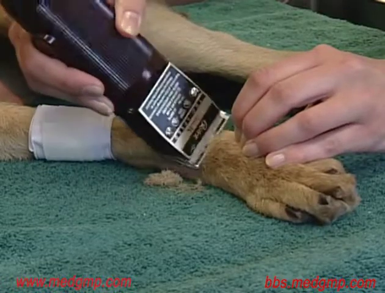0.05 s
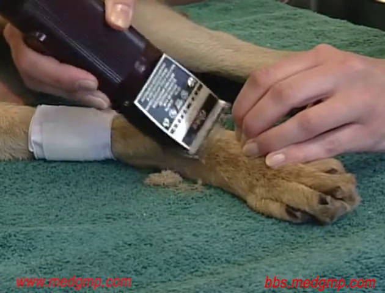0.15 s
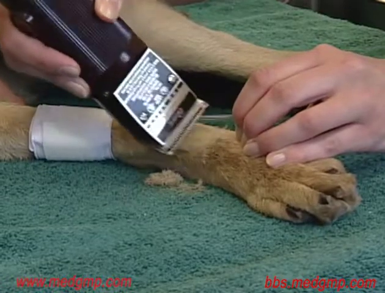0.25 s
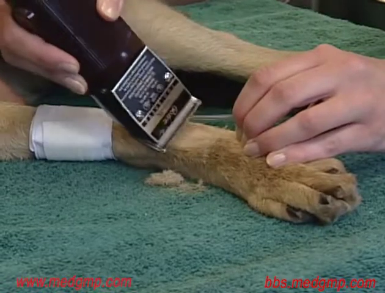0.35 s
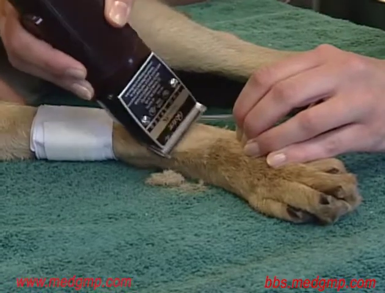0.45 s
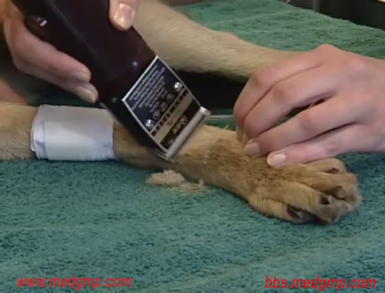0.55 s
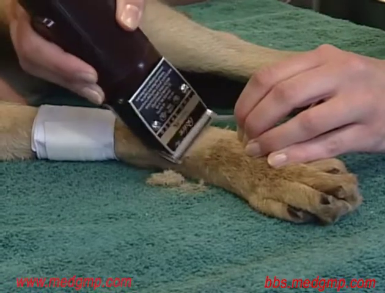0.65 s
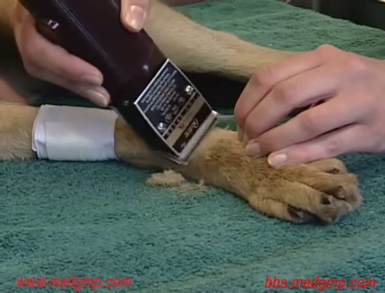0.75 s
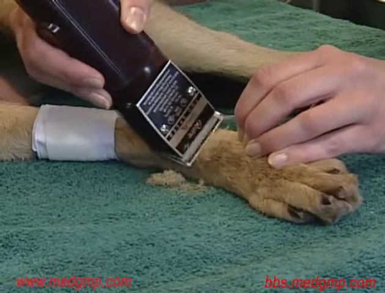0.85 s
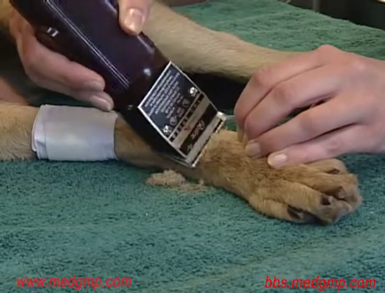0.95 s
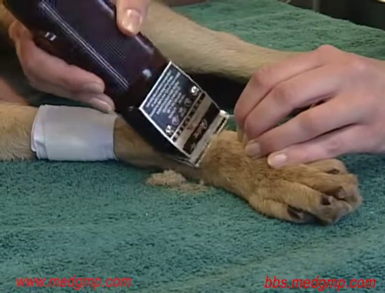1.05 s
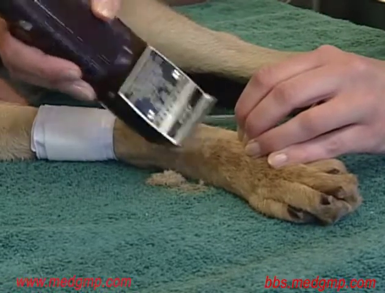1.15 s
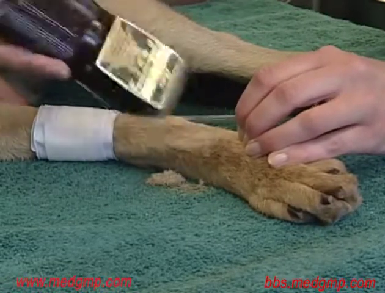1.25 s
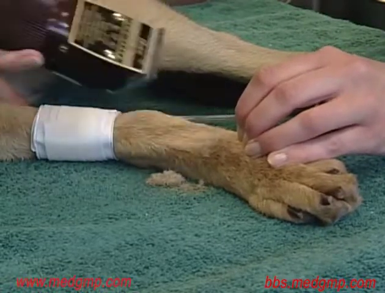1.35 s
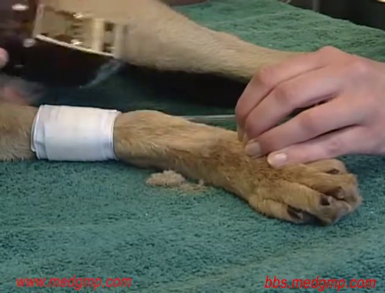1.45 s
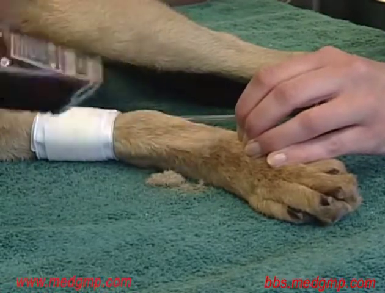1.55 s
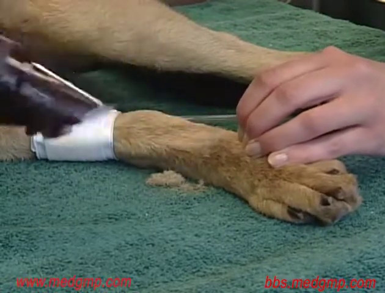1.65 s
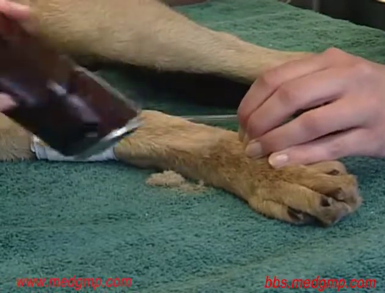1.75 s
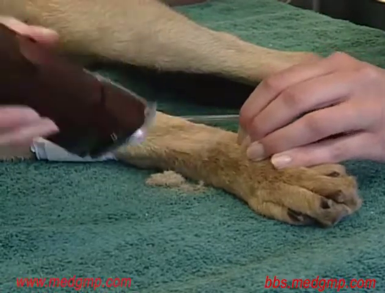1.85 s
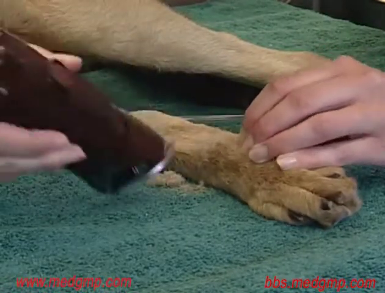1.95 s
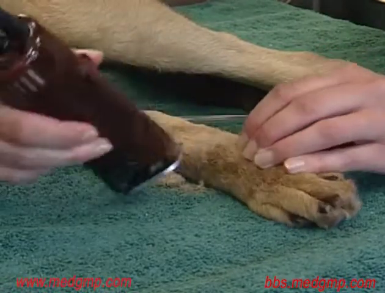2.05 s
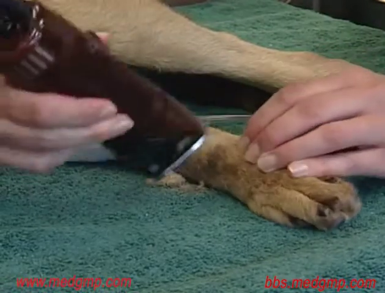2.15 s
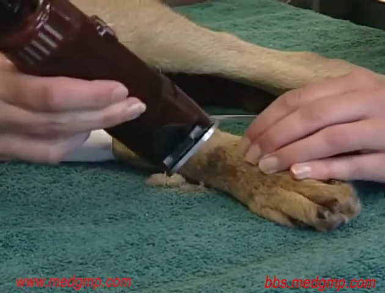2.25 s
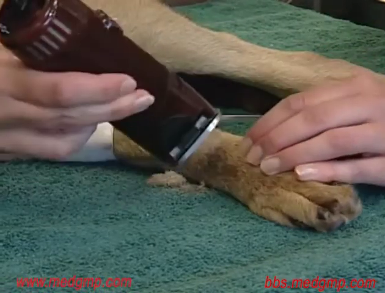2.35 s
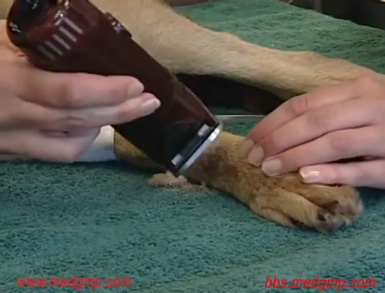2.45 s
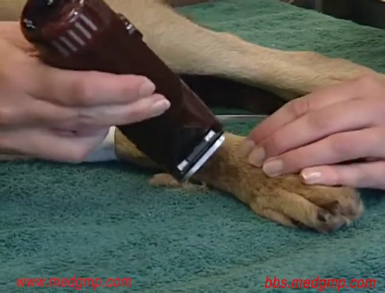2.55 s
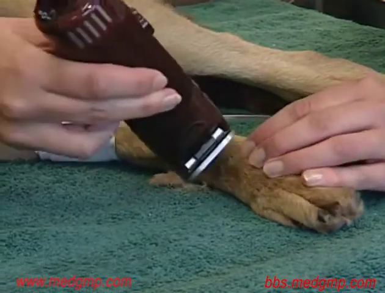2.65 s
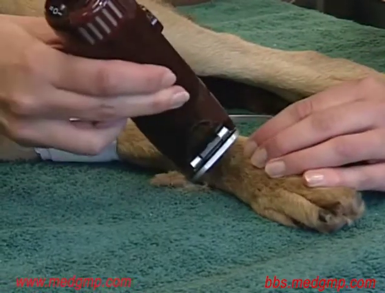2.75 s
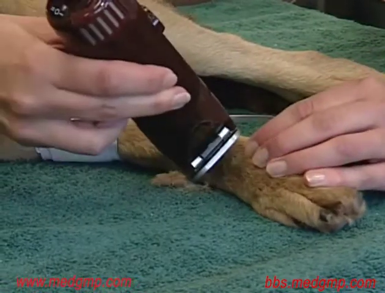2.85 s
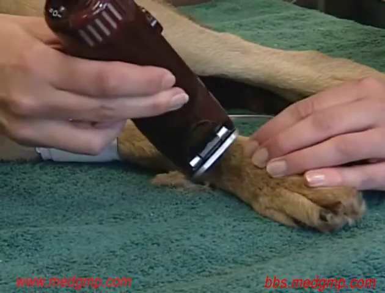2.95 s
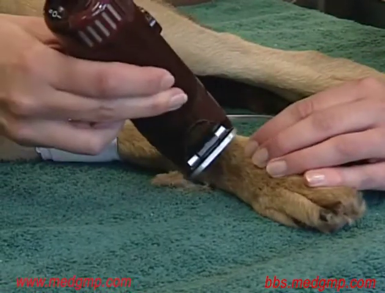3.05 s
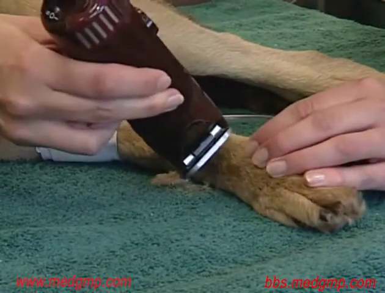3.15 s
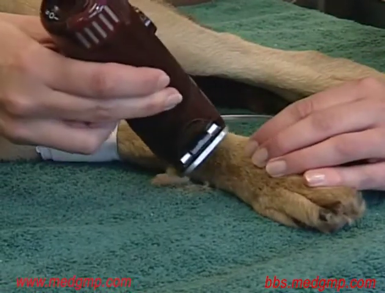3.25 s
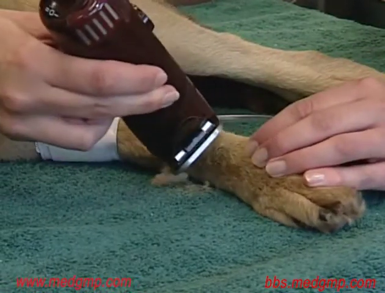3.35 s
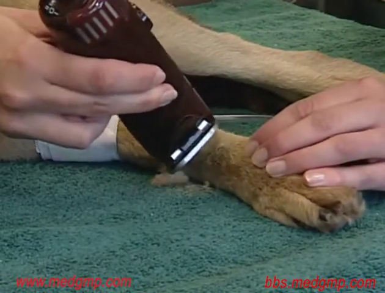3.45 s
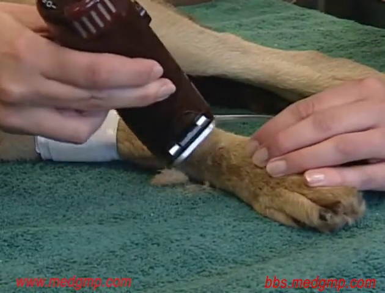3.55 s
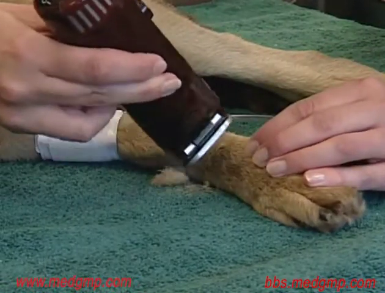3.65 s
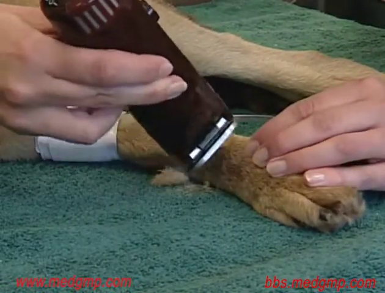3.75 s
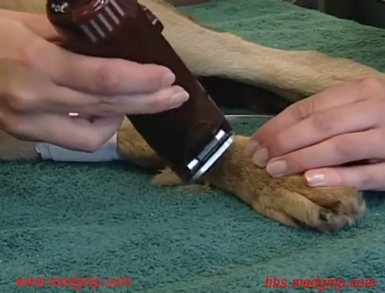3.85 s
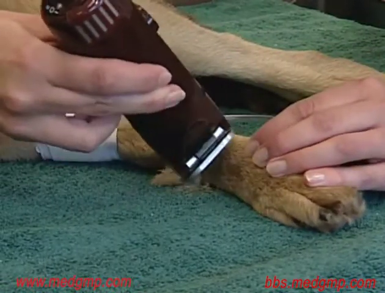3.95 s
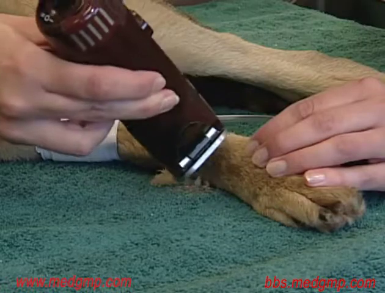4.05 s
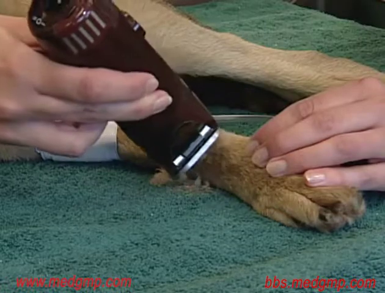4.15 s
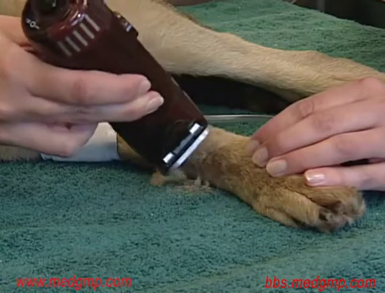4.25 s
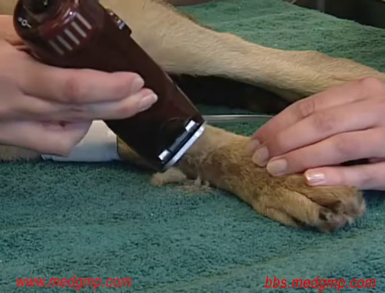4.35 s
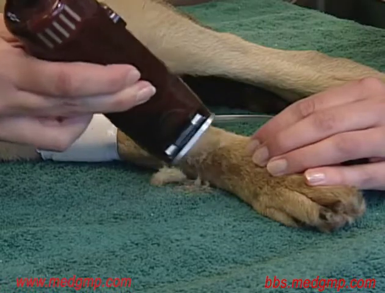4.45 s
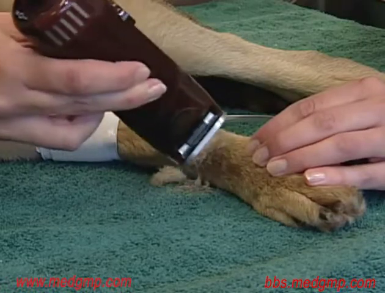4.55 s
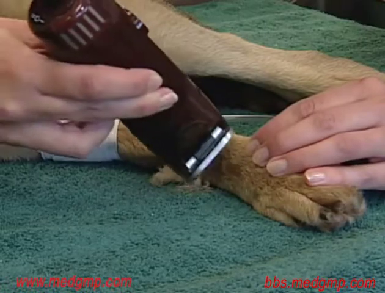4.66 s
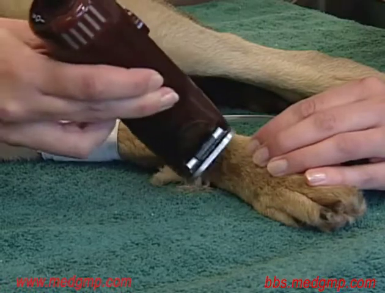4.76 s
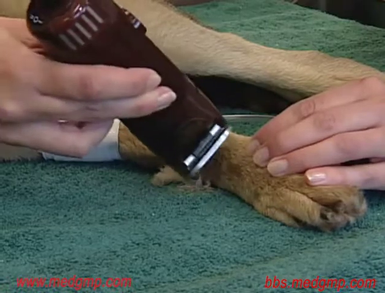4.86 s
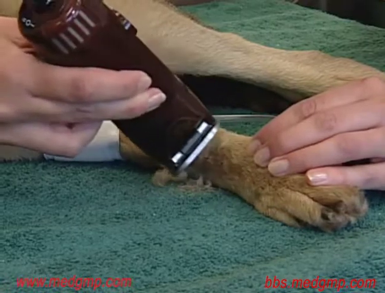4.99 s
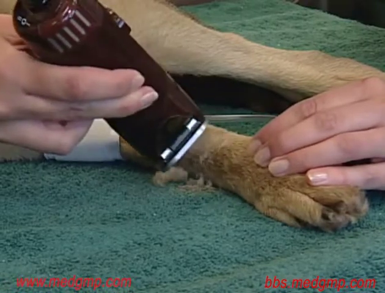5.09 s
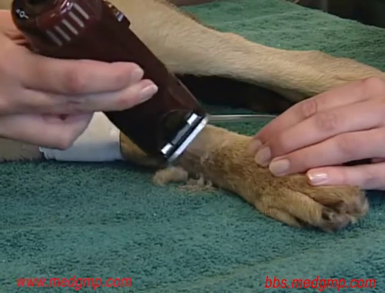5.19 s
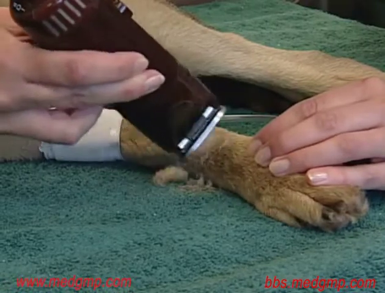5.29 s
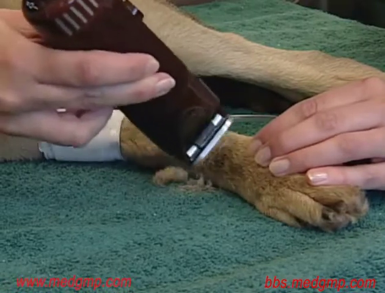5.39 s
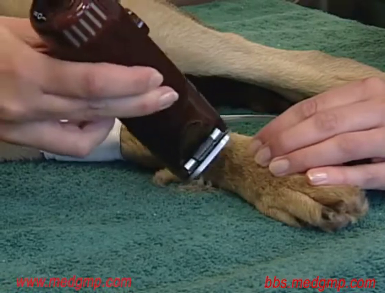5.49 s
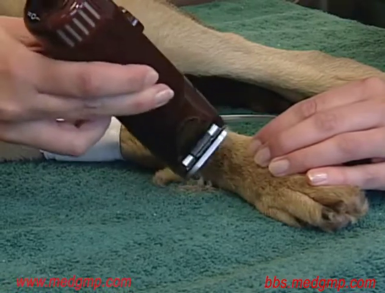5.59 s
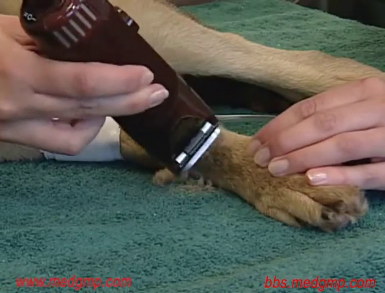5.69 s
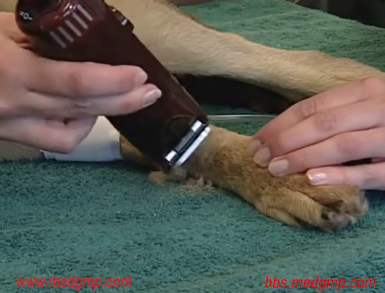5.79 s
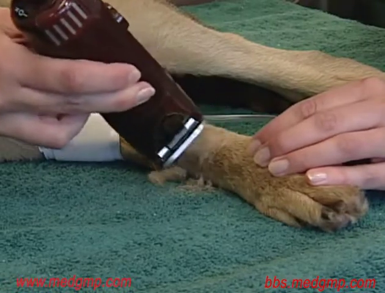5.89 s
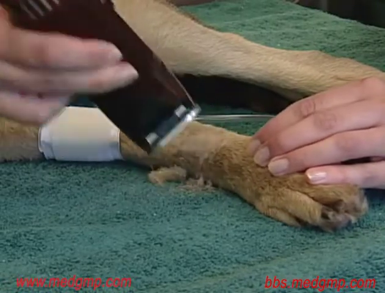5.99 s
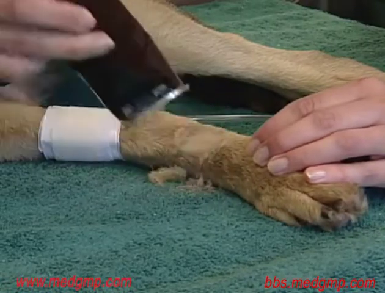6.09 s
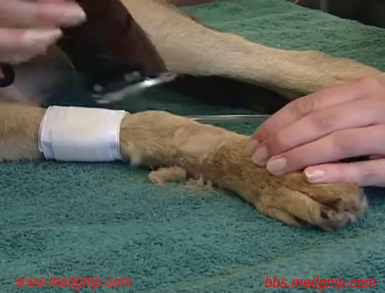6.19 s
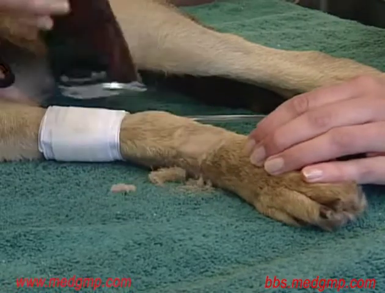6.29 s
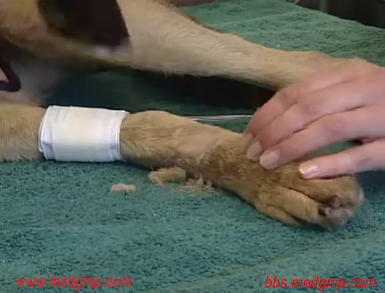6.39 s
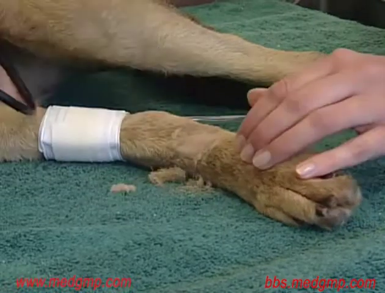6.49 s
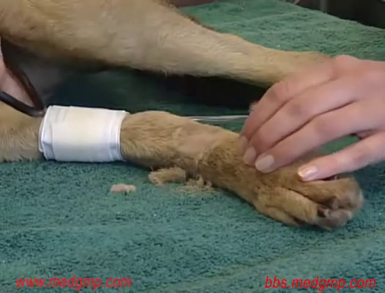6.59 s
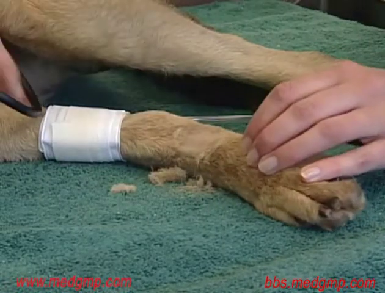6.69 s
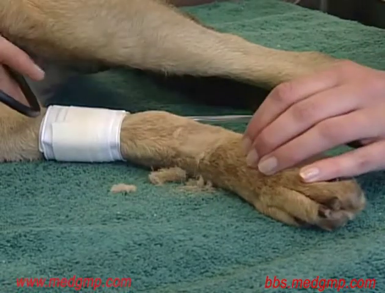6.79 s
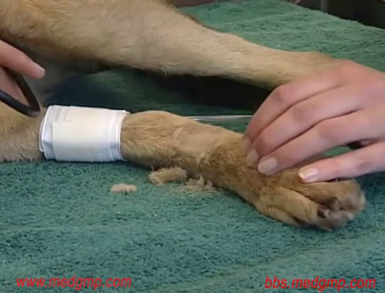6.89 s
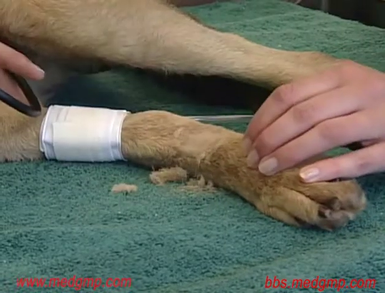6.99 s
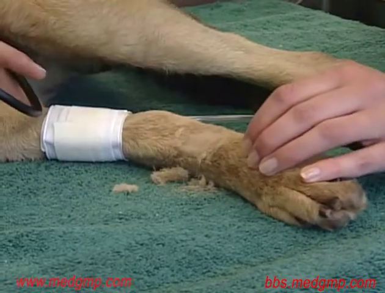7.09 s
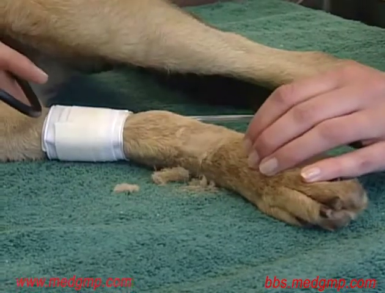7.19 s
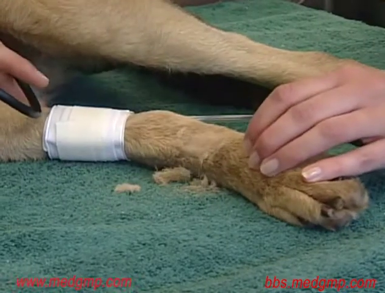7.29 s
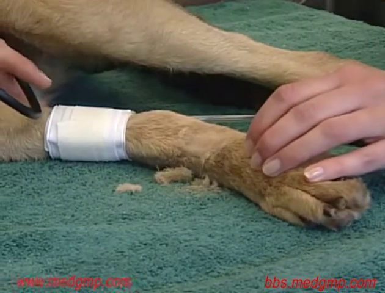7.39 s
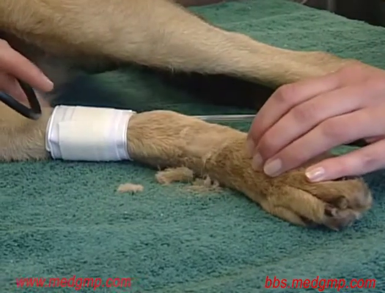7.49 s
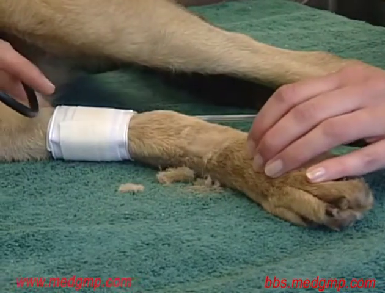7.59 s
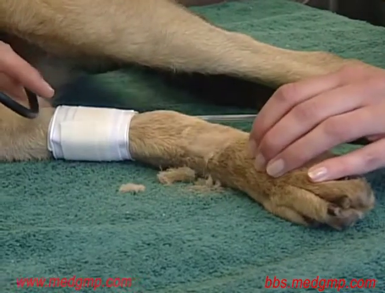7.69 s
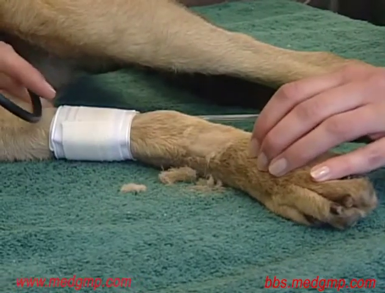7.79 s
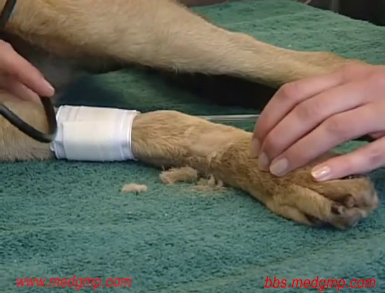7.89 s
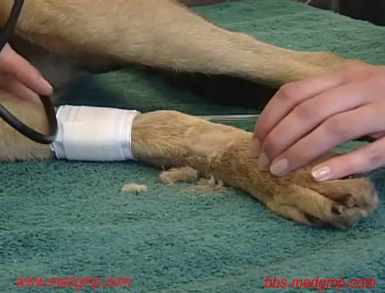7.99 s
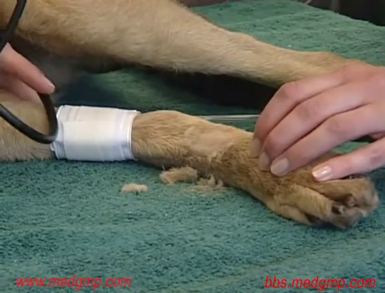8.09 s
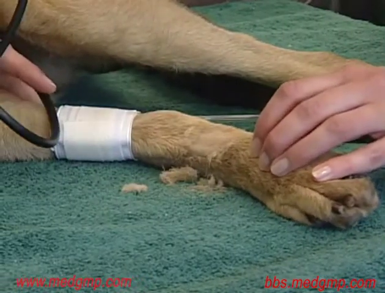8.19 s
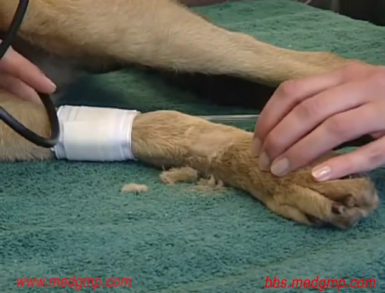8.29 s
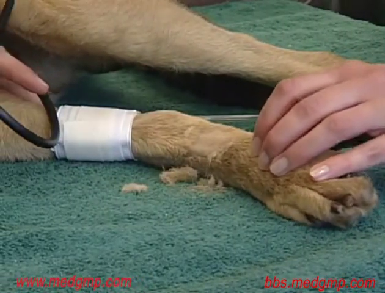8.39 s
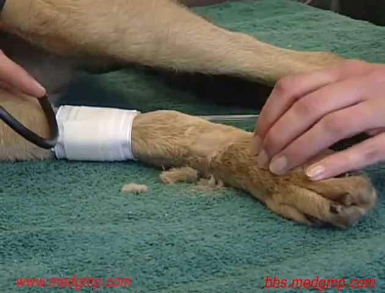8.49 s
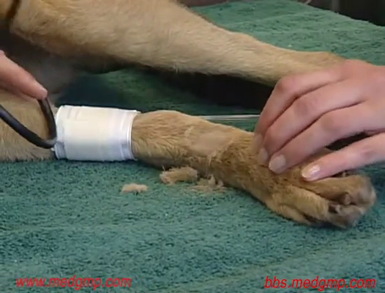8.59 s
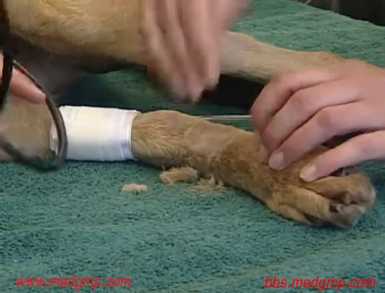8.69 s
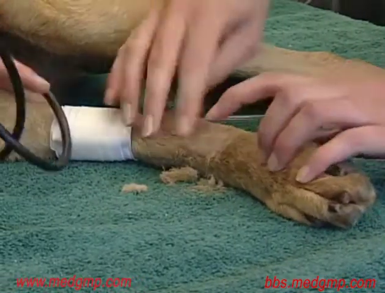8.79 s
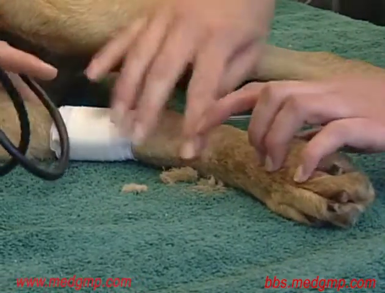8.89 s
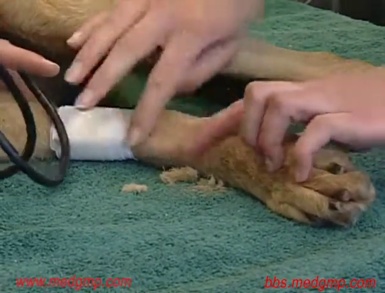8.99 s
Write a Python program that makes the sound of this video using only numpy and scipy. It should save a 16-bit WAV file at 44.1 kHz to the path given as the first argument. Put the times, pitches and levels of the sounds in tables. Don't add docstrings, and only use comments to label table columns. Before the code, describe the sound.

Steady harsh clipper buzz with a high motor whine for seven seconds, a switch click, quick run-down, then soft cloth rustles over room hum.

```python
import sys
import numpy as np
from scipy import signal
from scipy.fft import rfft, irfft, next_fast_len
from scipy.io import wavfile
from scipy.ndimage import uniform_filter1d, map_coordinates

SR = 44100
rng = np.random.default_rng(int(sys.argv[2]) if len(sys.argv) > 2 else 0)


def file_out(sig):
    cols = np.atleast_2d(sig).T
    lim = np.clip(cols, -1, 1)
    pcm = np.round(lim * 32767).astype(np.int16)
    wavfile.write(sys.argv[1], SR, pcm)


def rack_gain(trim_db):
    fader = np.asarray(trim_db, float)
    return 10 ** (fader / 20)


N = 398650
TIME = np.arange(N) / SR
FAST = next_fast_len(N)
FREQ = np.maximum(np.arange(FAST // 2 + 1) * SR / FAST, 1)
OFF_S = 6.92
RUNNING = slice(0, int(7.7 * SR))
MAINS_RIPPLE_HZ = 120
KNOCKS_PER_TURN = .6


def curves(table, before=None, after=None):
    s, *columns = np.transpose(table)
    return [np.interp(TIME, s, c, before, after) for c in columns]


def unit(x):
    return x / np.sqrt(np.mean(x ** 2))


def filtered(x, gain):
    return irfft(rfft(x, FAST) * gain, FAST)[:N]


def colour(x, points):
    hz, db = np.transpose(points)
    return filtered(x, rack_gain(np.interp(np.log(FREQ), np.log(hz), db)))


def band(x, lo_hz, hi_hz, order=8):
    low_edge = 1 + (lo_hz / FREQ) ** (2 * order)
    high_edge = 1 + (FREQ / hi_hz) ** (2 * order)
    return unit(filtered(x, 1 / np.sqrt(low_edge * high_edge)))


def ring(x, modes):
    return filtered(x, rack_gain(sum(db / (1 + (2 * (FREQ - hz) / width) ** 2) for hz, width, db in modes)))


def resonate(x, hz, width):
    return signal.lfilter(*signal.iirpeak(hz, hz / width, SR), x)


def echo(x, lag_ms):
    return map_coordinates(x, [np.arange(N) - lag_ms * SR / 1000], order=3)


def walk(rate, part=slice(None)):
    count = int(rate * N / SR) + 2
    return 1.01 * np.interp(TIME[part] * rate, np.arange(count), rng.standard_normal(count))


def span(start, end):
    return slice(max(int(start * SR), 0), int(end * SR))


def swing(start, end):
    return np.sin(np.pi * np.clip((TIME[span(start, end)] - start) / (end - start), 0, 1)) ** .7


def swell(start, rise, fade):
    up = np.sin(np.pi / 2 * np.clip((TIME - start) / rise, 0, 1)) ** 2
    return up * rack_gain(-20 * np.maximum(TIME - start - rise, 0) / fade)


# (t/s, shaft speed f/Hz)
SPEED = [(0, 125.7), (1.2, 126), (1.4, 127.4), (1.65, 127.2), (2.0, 128.4), (2.2, 128.1), (3.0, 128.6),
         (3.2, 127.5), (3.5, 126.2), (4.0, 127.2), (4.4, 126.7), (4.8, 127.6), (5.2, 126.8), (5.5, 127.6),
         (6.0, 127.5), (6.4, 128.4), (6.6, 127.7), (6.93, 127.4)]


def shaft():
    speed_hz, = curves(SPEED)
    slowing_hz_per_s = 236
    return np.maximum(speed_hz - slowing_hz_per_s * np.maximum(TIME - OFF_S, 0), 0)


def coasting(speed_hz):
    tail_s, drop_db = .19, -2
    left = uniform_filter1d(np.minimum(speed_hz / SPEED[-1][1], 1), int(tail_s * SR), mode="nearest")
    left = np.where(TIME < OFF_S - tail_s, 1, left)
    return 20 * np.log10(left + 1e-4) + drop_db * np.clip((TIME - OFF_S) / 0.057, 0, 1)


HAND = [(0, 0.05, 0.5), (.45, .05, -.5), (1.0, 0.056, 0.5), (1.13, 0.14, -2.5), (1.4, 0.86, -1),
        (1.97, 1.1, 0.5), (2.08, 1.74, 0), (2.4, 2, 0), (3.22, 2.1, 0), (3.4, 2.6, -1), (3.8, 3.3, -1),
        (4.3, 3, 0.5), (4.9, 2.6, 0), (5.3, 2.84, -0.5), (6.02, 2.7, 1), (6.3, 4.2, 0.5), (6.6, 4.3, -1),
        (6.9, 4.3, 0.5)]


def facing(levels_db):
    grip, near_db = curves(HAND)
    return np.interp(grip, np.arange(len(levels_db)), levels_db) + near_db


def tones(turns, orders, level_db, shift_hz=0, part=RUNNING):
    out = np.zeros(N)
    for k, db in orders:
        cycles = k * turns[part] + shift_hz * TIME[part]
        phase = 2 * np.pi * (cycles + rng.random() + .025 * walk(30, part))
        out[part] += rack_gain(db + 1.3 * walk(8, part)) * np.sin(phase)
    return np.sqrt(2) * rack_gain(level_db) * out


# (from t/s, to t/s, multiple of shaft, shift f/Hz, level/dB)
GLINTS = [(1.45, 1.83, 48, 0, -45), (1.952, 2.27, 48, 0, -44), (2.7, 3.05, 48, 0, -47),
          (4.548, 4.95, 48, 0, -50), (6.26, 6.46, 48, 0, -47), (6.55, 6.98, 48, 0, -44),
          (-.6, 1.8, 2, 0, -55), (1.45, 1.78, 24, 0, -48), (6.25, 6.5, 32, 120.5, -38),
          (1.49, 1.7, 32, 120, -45), (5.8, 6.15, 32, 2, -45)]


def glints(turns):
    out = np.zeros(N)
    for start, end, k, shift_hz, db in GLINTS:
        part = span(start, end)
        out[part] += swing(start, end) * tones(turns, [(k, db)], 0, shift_hz, part)[part]
    return out


# (multiple of shaft, level/dB re gear tone)
GEAR_ORDERS = [(12, -3.5)]
# (multiple of shaft, level/dB re high gear tone)
HIGH_ORDERS = [(2, -14.5), (24, -5), (46, -3), (48, 1)]
# (multiple of shaft, level/dB)
FAINT_ORDERS = [(16, -53.5), (30, -64), (40, -55), (42, -63), (50, -64), (54, -73), (58, -63), (64, -58)]
# (multiple of blade cycle, level/dB)
STROKE_ORDERS = [(13, -59.5), (15, -63.5), (20, -58.5), (41, -63), (44, -57), (49, -61), (50, -60),
                 (52, -58), (61, -55), (67, -60)]
# (level/dB, ..)
GEAR_DB = (-43.5, -47, -44, -45.5, -54)
SLOT_LOWER_DB = (-46, -49.5, -40.5, -45.5, -40)
SLOT_UPPER_DB = (-60, -47.5, -36.5, -40.5, -46)
HIGH_GEAR_DB = (-43.5, -52, -54.5, -54, -51)


def motor(turns, speed_hz):
    running_db = np.interp(TIME, [6.9, 6.97], [0, -45])
    lower_db = facing(SLOT_LOWER_DB) + running_db
    upper_db = facing(SLOT_UPPER_DB) + running_db
    high_db = facing(HIGH_GEAR_DB) + running_db
    whine_hz, whine_width_hz, whine_db = 1010, 300, -44
    detune = 2 * (GEAR_ORDERS[0][0] * speed_hz - whine_hz) / whine_width_hz
    gear_db = np.where(TIME < OFF_S, facing(GEAR_DB), whine_db - 10 * np.log10(1 + detune ** 4))
    slot = tones(turns, [(32, 0)], lower_db, -MAINS_RIPPLE_HZ)
    slot = slot + tones(turns, [(32, -3.5)], upper_db)
    slot = slot + tones(turns, [(32, -2.1)], upper_db, MAINS_RIPPLE_HZ)
    gears = tones(turns, GEAR_ORDERS, gear_db) + tones(turns, HIGH_ORDERS, high_db)
    stroke = tones(turns * KNOCKS_PER_TURN / 2, STROKE_ORDERS, running_db)
    faint = tones(turns, FAINT_ORDERS, running_db)
    return glints(turns) + slot + gears + stroke + faint


# (t/s, peak level/dB)
HARD_BLOWS = [(0.7296, -15), (0.9677, -20), (1.337, -18), (1.6776, -20), (1.9128, -17), (2.0682, -16),
              (2.3925, -15), (2.6514, -18), (3.0016, -17.5), (3.2505, -17), (3.5927, -18), (4.1176, -17),
              (4.2755, -14), (4.4332, -16), (4.8259, -16), (5.992, -18), (6.161, -15), (6.2267, -16),
              (6.344, -14), (6.4991, -14), (6.5514, -16), (6.7745, -13), (6.8645, -15), (7.0178, -24),
              (7.1507, -27), (7.2693, -36), (7.3593, -45)]


def knocks(turns):
    count = int(KNOCKS_PER_TURN * turns[-1]) + 4
    number = np.arange(count)
    chance = rng.random((count, 2)).T - .5
    stroke = number + .15 + .04 * (-1) ** number + .06 * chance[0]
    when = (np.array(HARD_BLOWS)[:, 0] * SR).astype(int)
    free = KNOCKS_PER_TURN * turns - .15
    slip = np.unwrap(-free[when] % 1, period=1)
    crank = np.maximum.accumulate(KNOCKS_PER_TURN * turns + np.interp(np.arange(N), when, slip))
    at = np.searchsorted(crank, stroke).clip(0, N - 1)
    size_db = 4 * chance[1] + 1.3 * np.cos(2 * np.pi * number / 3)
    usual_blow_db = -20
    for s, db in HARD_BLOWS:
        nearest = np.argmin(np.abs(at - s * SR))
        at[nearest] = int(s * SR)
        size_db[nearest] = np.clip(db - usual_blow_db, 0, 4)
    blows = np.zeros(N)
    blows[at] = rack_gain(size_db) * (at < N - 1)
    blows *= rack_gain(np.interp(TIME, [6.95, 7.3], [0, 1]))
    t = np.arange(600) / SR
    shape = (1 - np.exp(-t / .0004)) * np.exp(-t / .0015)
    same = signal.fftconvolve(blows, shape * rng.standard_normal(len(t)))[:N]
    fresh = signal.fftconvolve(blows, shape)[:N] * rng.standard_normal(N)
    return unit(fresh + .6 * same)


# (f/Hz, level/dB)
KNOCK_SHARE = [(400, -3.5), (1000, -6), (2000, 6.5), (3500, 0.5), (5500, -3), (7500, -13.5), (11000, -12.5)]


def blade_drive(turns):
    ripple = 1 + .17 * np.sin(2 * np.pi * MAINS_RIPPLE_HZ * TIME) * (TIME < OFF_S)
    slide = rack_gain(-0.5) * ripple * rng.standard_normal(N)
    return colour(knocks(turns), KNOCK_SHARE) + slide


# (f/Hz, level/dB per Hz)
BODY = [(250, -8), (500, -8), (800, -11), (1300, -8.5), (2300, -11), (3600, -2), (4600, -4.5), (6500, -9.5),
        (8000, -11.5), (9000, -11.5), (10300, -11.5), (11500, -5.5), (13200, 0), (15700, -2.5)]
# (f/Hz, width/Hz, lift level/dB)
CASE = [(578, 250, 5.5), (925, 300, 7.5), (1540, 390, 2), (1943, 480, 5.5), (2596, 88, 6.5), (3130, 500, 4),
        (4050, 380, 2), (5160, 180, 2), (7350, 130, 7.5)]
# (t/s, lag/ms)
TABLE_ECHO = [(0, .62), (1.1, .62), (1.6, .7), (2.3, .655), (3.1, .695), (3.8, .66), (4.5, .63),
              (5.6, .635), (6.2, .63), (7.0, .7)]
# (level/dB, ..)
LOW_CASE_DB = (-45.5, -47.5, -43.5, -44, -45)
KNOCK_DB = (-42.5, -43, -39.5, -39.5, -41.5)
UPPER_CASE_DB = (-40.5, -44.5, -45.5, -47.5, -36)
PLATE_DB = (-41.5, -42.5, -37, -37, -39.5)
VENT_DB = (-34.5, -45, -42, -52.5, -43.5)
AIR_DB = (-52.5, -44, -45.5, -43.5, -42.5)
BRUSH_DB = (-45.5, -50, -42, -42.5, -45)
# (from t/s, to t/s, f/Hz, width/Hz,
# level/dB)
FLARES = [(-.3, 1.2, 2250, 302, -48.5), (1.184, 1.67, 4050, 548, -40), (1.519, 1.8, 3120, 500, -49),
          (1.3, 1.75, 7930, 690, -43), (1.85, 2.3, 8130, 599.3, -46), (2.899, 3.25, 4353, 250.6, -47),
          (6.055, 6.276, 7377, 500.2, -36.5), (6.15, 6.6, 3400, 600, -40), (6.25, 6.6, 4200, 350, -41),
          (6.699, 7.2, 3080, 600.8, -46), (6.36, 7.25, 970, 257, -46.5), (7.31, 7.381, 260, 161, -47),
          (-.5, 1.15, 12800, 1200, -49), (1.15, 1.6, 10700, 900, -55), (1.65, 2.0, 14000, 1200, -50),
          (2.15, 2.7, 14400, 900, -55), (2.2, 4, 11400, 900, -55), (6.0, 6.6, 10100, 700, -52),
          (6.4, 7.3, 2350, 350, -48.5), (6.6, 7.05, 5800, 700, -45), (.6, 1.02, 2280, 500, -48),
          (2.15, 2.6, 7400, 350, -43), (6.05, 6.3, 2080, 600, -45), (7.2, 7.42, 5200, 1600, -55),
          (-1.5, 1.3, 7200, 400, -41),
    (-.4, .9, 10300, 700, -52),
    (6.7, 7.0, 4000, 600, -44),
]


def clippers(turns, coast_db):
    drive = blade_drive(turns)
    body = ring(colour(drive, BODY), CASE)
    lag_ms, = curves(TABLE_ECHO)
    from_table = (.12 + .07 * walk(2.5)) * echo(body, lag_ms)
    from_hands = .22 * echo(body, .27 + .02 * walk(1.2))
    echoed = body + from_table + from_hands
    # sound, lowest Hz, highest Hz, grip levels, power of the speed by which it fades
    parts = [(body, 330, 1300, LOW_CASE_DB, 1.1), (body, 1300, 2600, KNOCK_DB, 1.05),
             (body, 2600, 4400, UPPER_CASE_DB, 1.3), (body, 4400, 6800, PLATE_DB, .95),
             (body, 6800, 7800, VENT_DB, .95), (echoed, 7800, 10500, AIR_DB, .75),
             (echoed, 10500, 16000, BRUSH_DB, .6)]
    out = np.zeros(N)
    for sound, lo_hz, hi_hz, grip_db, power in parts:
        level_db = facing(grip_db) + power * coast_db + 0.68 * walk(5)
        out += rack_gain(level_db) * band(sound, lo_hz, hi_hz)
    for start, end, hz, width, db in FLARES:
        part = span(start, end)
        flare = resonate(resonate(drive[part], hz, 1.6 * width), hz, 1.6 * width)
        out[part] += rack_gain(db - 1) * swing(start, end) * unit(flare)
    return out


# (f/Hz, level/dB per Hz)
ROOM = [(15, -47), (25, -53), (45, -11.5), (119, -1), (210, -5), (268, -5.5), (370, -10), (402, -4),
        (618, -13.5), (688, -16.5), (854, -19.5), (13700, -43), (15700, -37)]


def room_hum(cloth):
    rumble = rack_gain(5.5) * cloth
    hum = np.hypot(rack_gain(-49 + 0.94 * walk(2.47)), rumble) * unit(colour(rng.standard_normal(N), ROOM))
    hiss = rack_gain(-69.5) * band(rng.standard_normal(N), 2500, 21000, order=2)
    drone = rack_gain(-62 + 2.0 * walk(4)) * np.sin(2 * np.pi * (499 * TIME + .1 * walk(20)))
    return hum + drone + hiss


def screen_whistle():
    return rack_gain(-60 + 2.5 * walk(5)) * np.sin(2 * np.pi * 15734 * TIME)


# (t/s, peak level/dB, lowest f/Hz)
TICKS = [
    (6.928, -13, 2000),
    (7.916, -37, 6000),
    (8.619, -35, 8000),
    (8.903, -44, 4000),
    (8.964, -31, 300),
]


def ticks():
    out = np.zeros(N)
    for s, db, lo_hz in TICKS:
        fade = (TIME >= s) * rack_gain(db - 3.5 - 60 * np.maximum(TIME - s, 0) / .006)
        out += fade * signal.lfilter(*signal.butter(2, lo_hz, "high", fs=SR), rng.standard_normal(N))
    return out


# (start t/s, rise t/s, fade to -20 dB t/s, level/dB, bright part level/dB)
RUSTLES = [
    (7.5, .08, 0.4, -60, -12),
    (7.66, .12, .5, -54.5, -13),
    (7.85, .07, 0.089, -56.5, -11),
    (8.2, .1, .2, -68, -19),
    (8.34, .15, 1.0, -54.5, -15),
    (8.45, 0.055, .5, -59.5, -6),
    (8.89, .05, .08, -61, -14),
]


def cloth_drags():
    drags = np.array([rack_gain(db) * swell(start, rise, fade) for start, rise, fade, db, _ in RUSTLES])
    return drags.sum(axis=0), rack_gain(np.array(RUSTLES)[:, -1]) @ drags


def rustles(cloth, sheen):
    fibres = rack_gain(2.0 * walk(60)) * rng.standard_normal(N)
    dull = band(colour(fibres, [(600, 7), (3000, -13.5)]), 500, 3100, order=2)
    bright = band(colour(fibres, [(3000, -6), (12000, -6)]), 3200, 13000, order=2)
    return cloth * dull + sheen * bright


def scene():
    speed_hz = shaft()
    turns = np.cumsum(speed_hz) / SR
    cloth, sheen = cloth_drags()
    tool = motor(turns, speed_hz) + clippers(turns, coasting(speed_hz))
    room = room_hum(cloth) + screen_whistle() + ticks() + rustles(cloth, sheen)
    return (tool + room)[None]


def low_pass(x):
    return signal.sosfilt(signal.butter(12, 15745, fs=SR, output="sos"), x)


# (t/s, level/dB)
SCENE_LEVEL = [
    (0, 0),
    (4.82, 0.5),
    (4.985, 2),
    (4.995, -2.5),
    (5.15, -2),
    (7.3, -0.5),
    (7.9, 0.6),
    (8.4, 0.3),
]


def record(dry):
    gain_db, = curves(SCENE_LEVEL)
    return low_pass(rack_gain(gain_db) * dry)


dry = scene()
out = record(dry)
file_out(out)
```